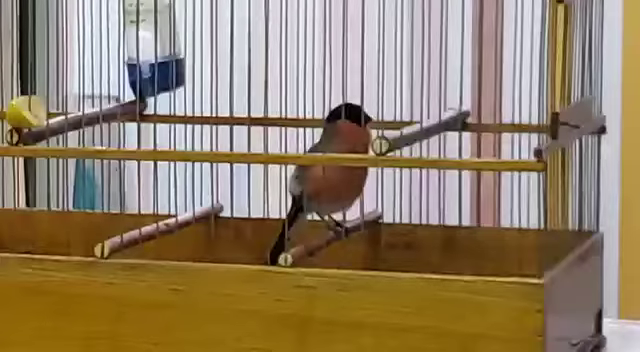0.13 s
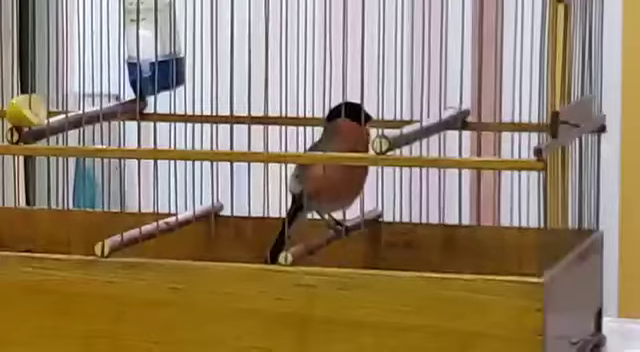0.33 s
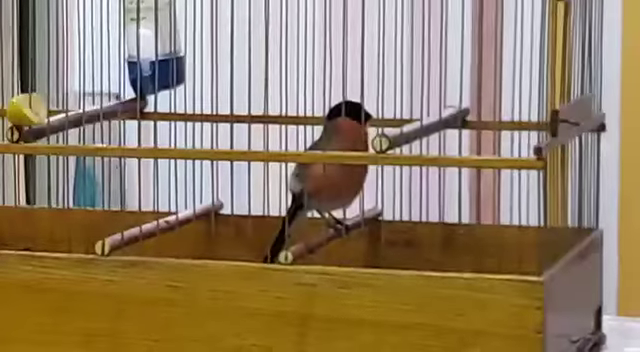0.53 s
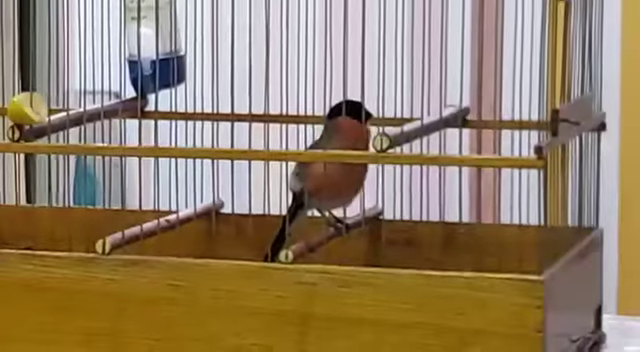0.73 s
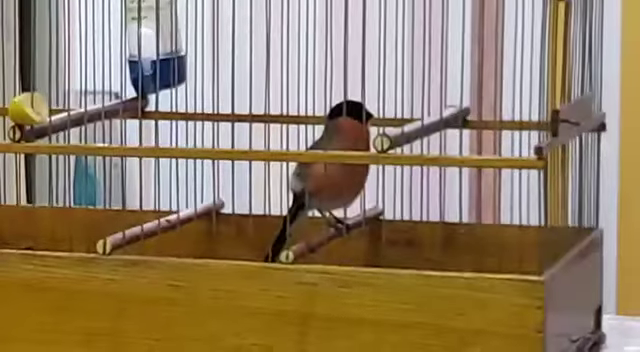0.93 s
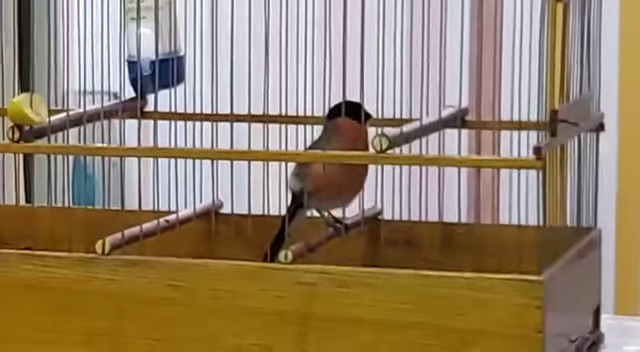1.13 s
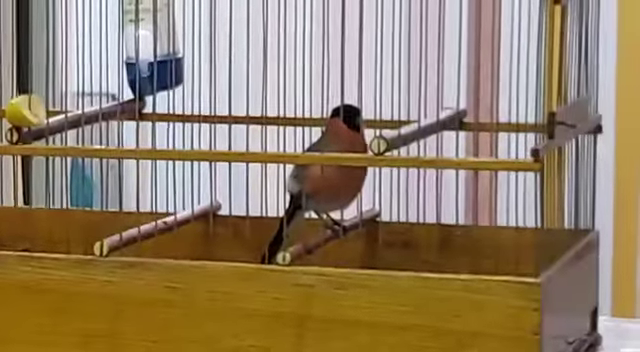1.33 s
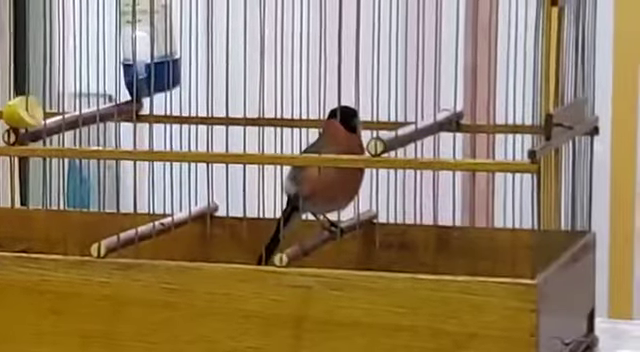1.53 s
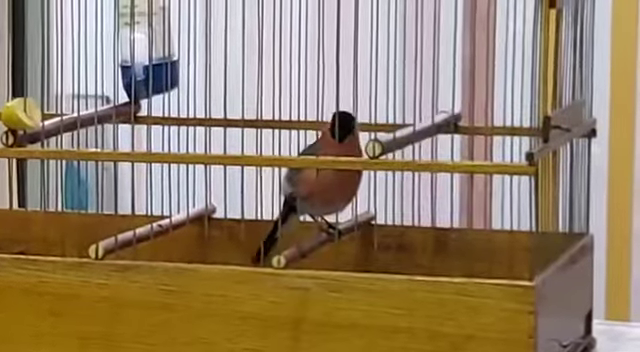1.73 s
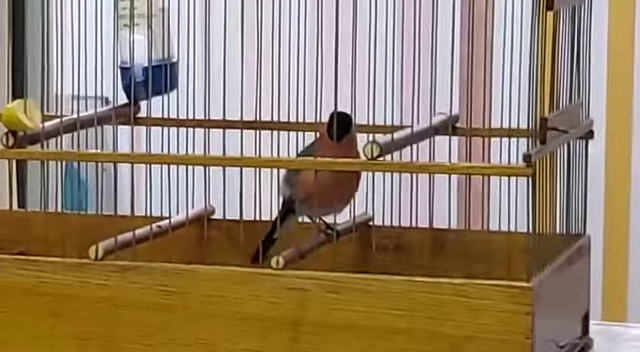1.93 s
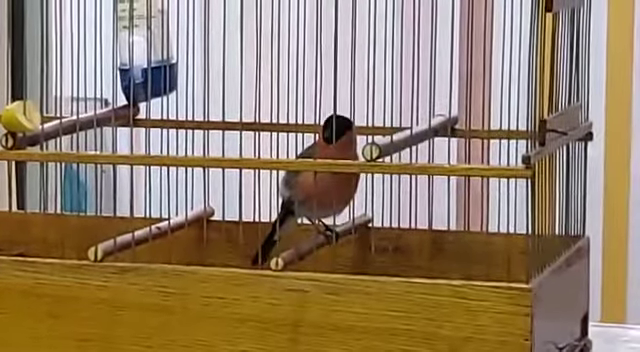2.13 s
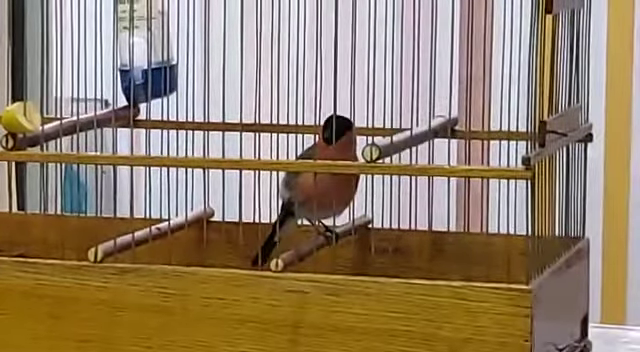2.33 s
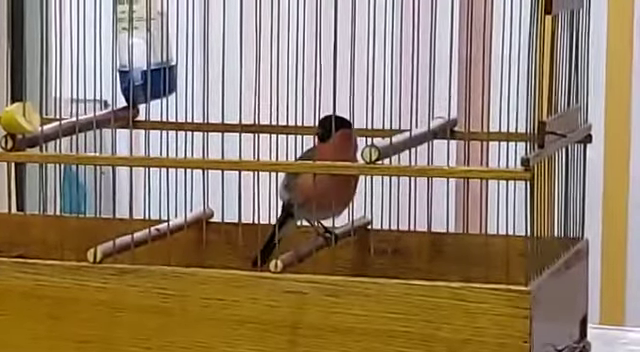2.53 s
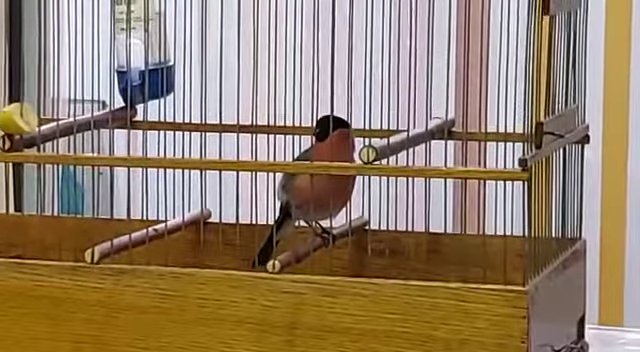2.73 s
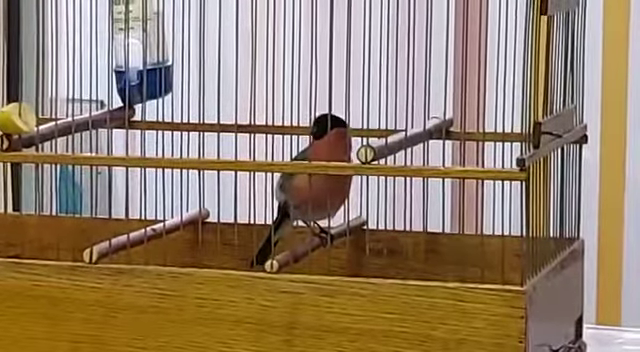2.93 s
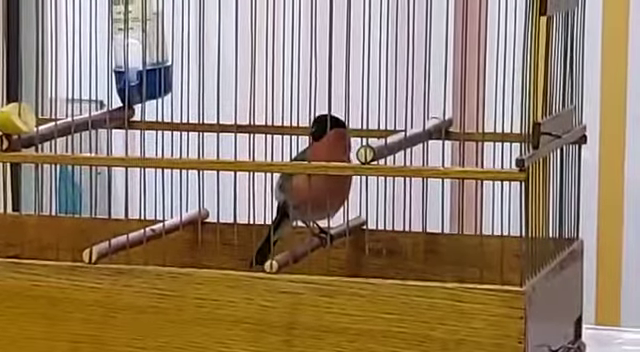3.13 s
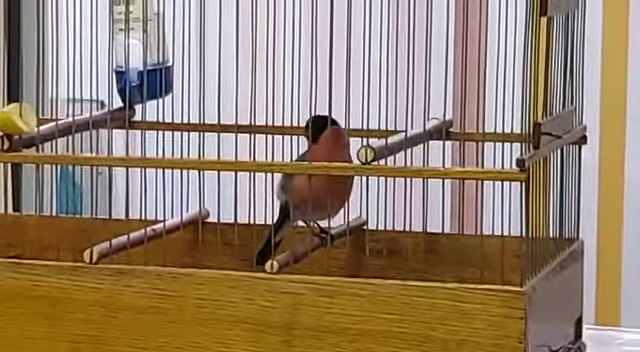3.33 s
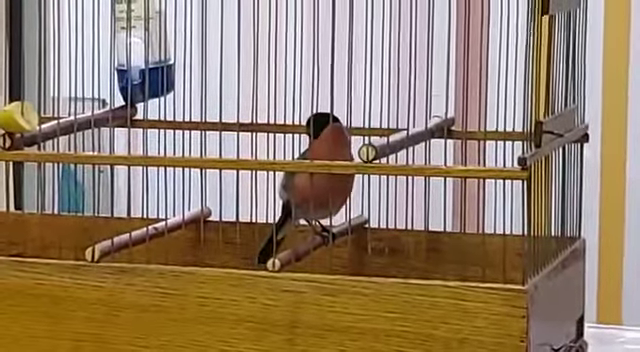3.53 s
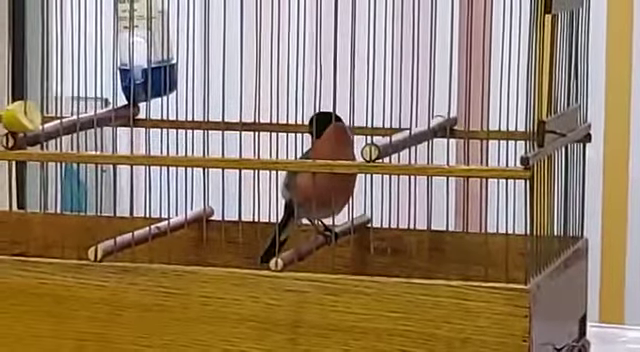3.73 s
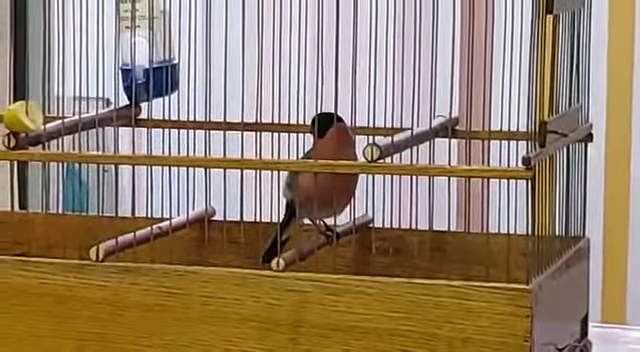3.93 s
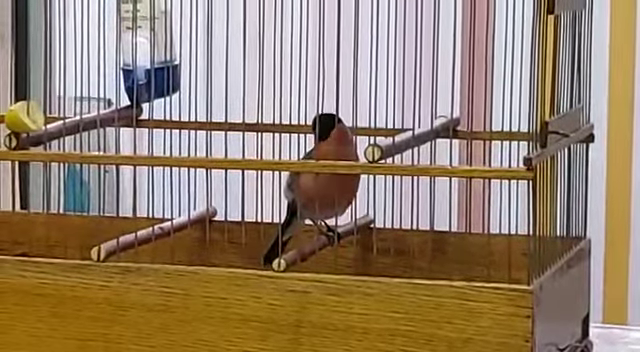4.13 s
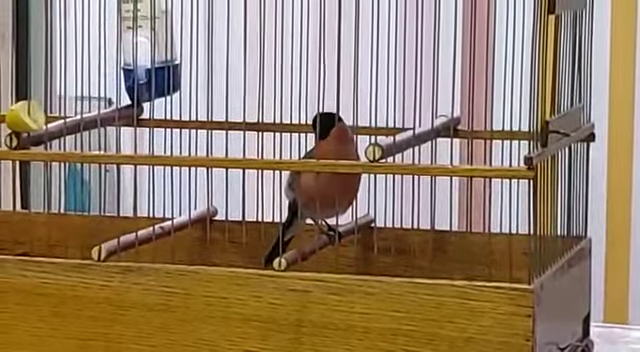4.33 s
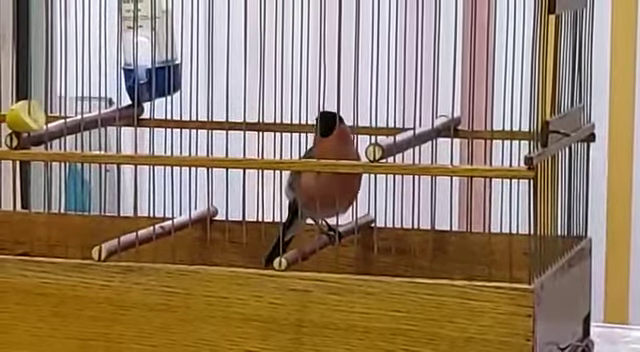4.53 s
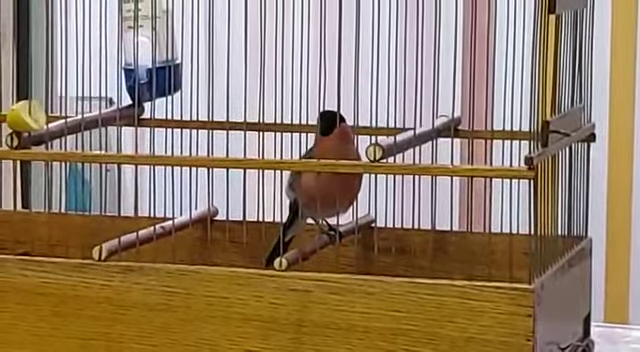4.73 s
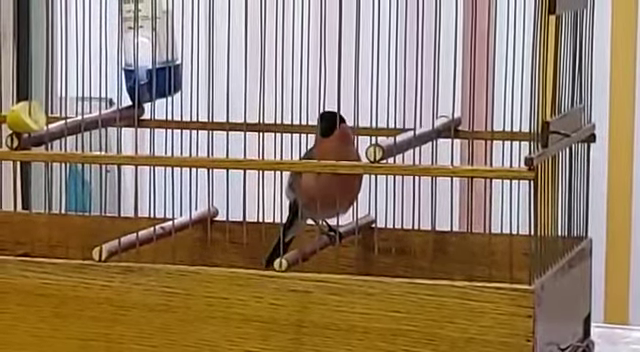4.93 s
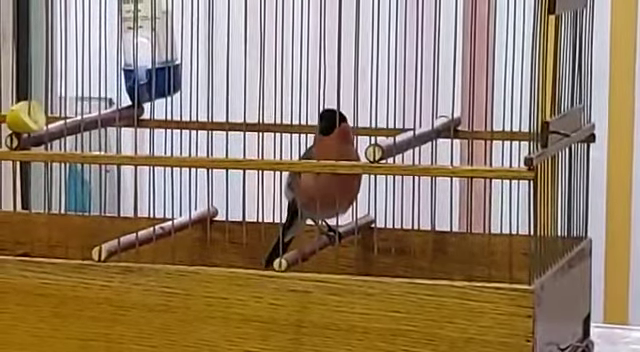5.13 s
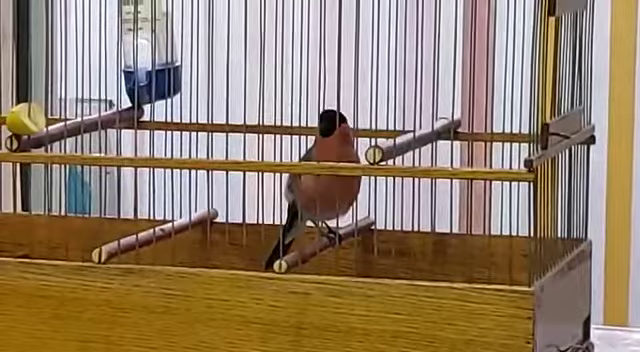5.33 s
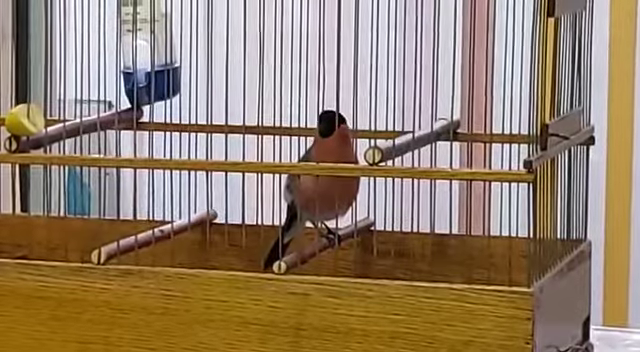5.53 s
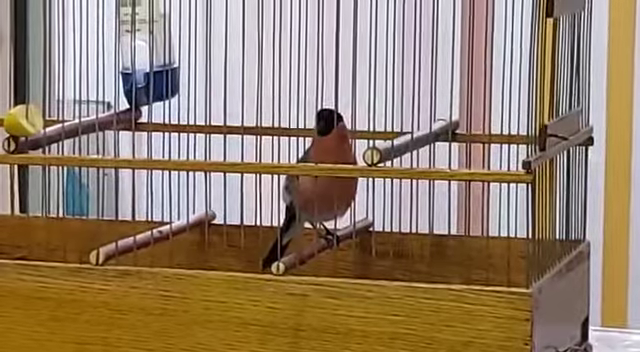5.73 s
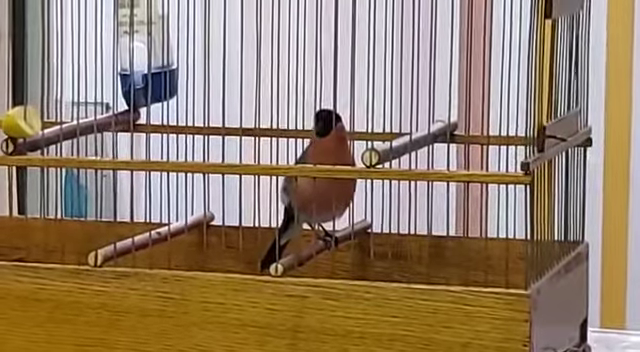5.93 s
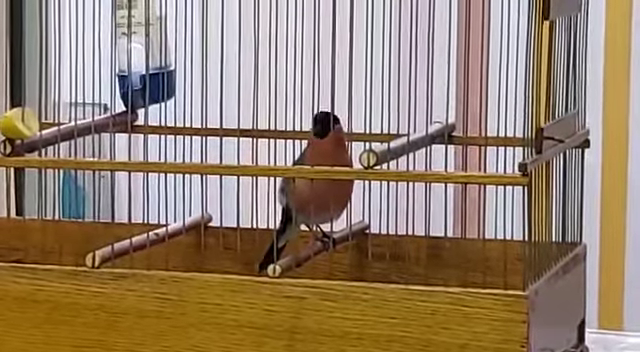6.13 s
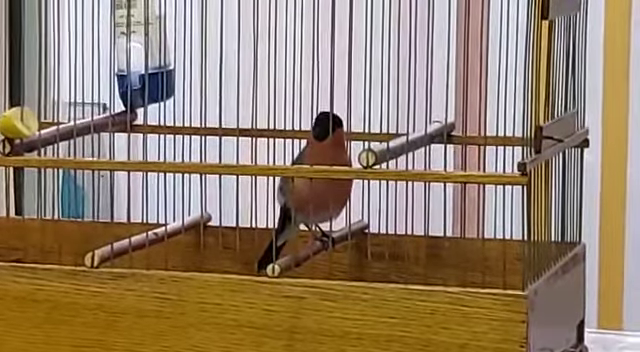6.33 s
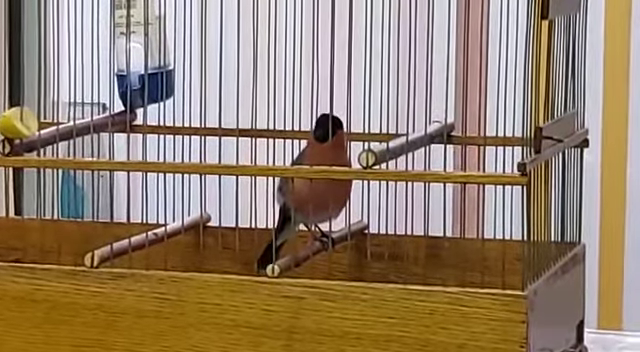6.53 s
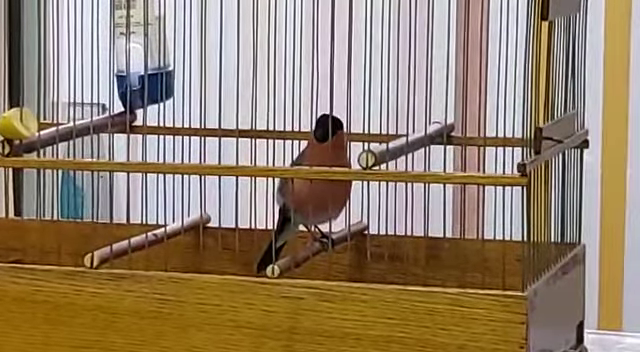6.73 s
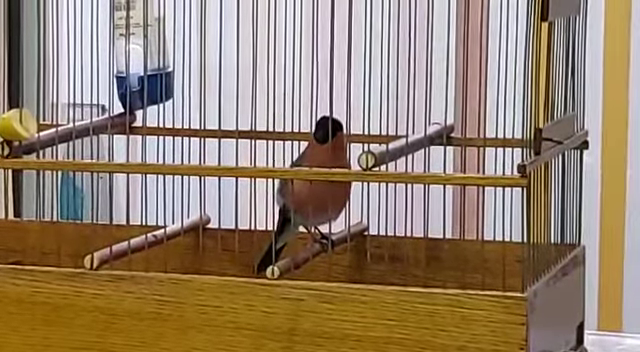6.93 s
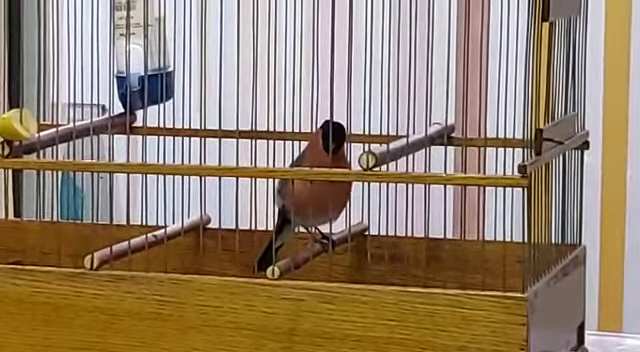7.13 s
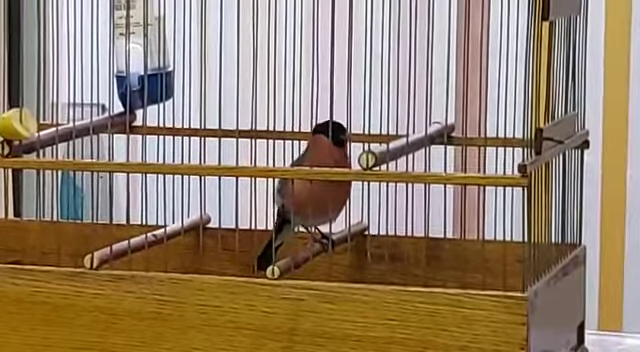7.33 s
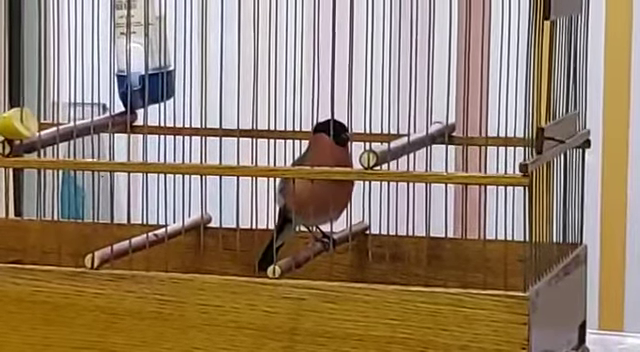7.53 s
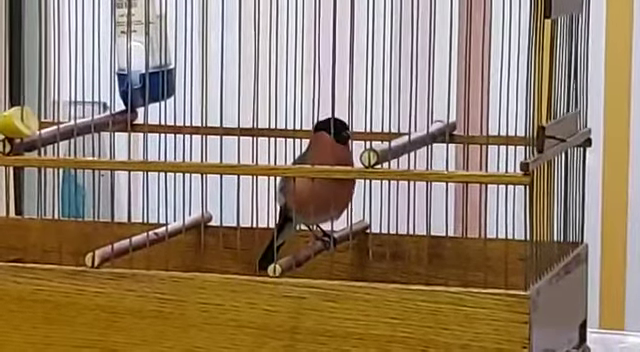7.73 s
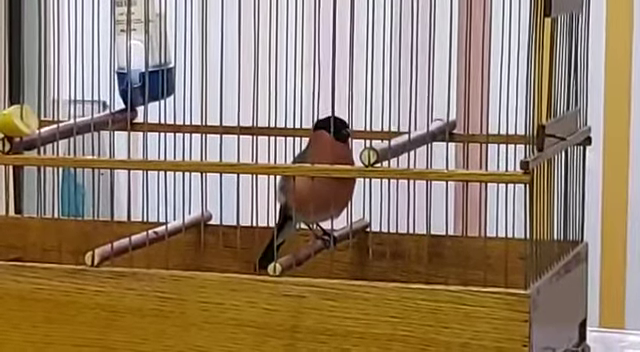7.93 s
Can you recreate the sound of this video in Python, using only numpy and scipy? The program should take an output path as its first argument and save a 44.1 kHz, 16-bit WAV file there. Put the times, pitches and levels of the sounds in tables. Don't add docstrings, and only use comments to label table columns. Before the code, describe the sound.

Quiet bullfinch song indoors: raspy grunts, sliding notes, one clear whistle, short chips, creaky snaps and piping notes above faint room rumble.

```python
import sys
import numpy as np
from scipy import signal
from scipy.fft import rfft, irfft, next_fast_len
from scipy.io import wavfile
from scipy.ndimage import uniform_filter1d, map_coordinates

SR = 44100
rng = np.random.default_rng(int(sys.argv[2]) if len(sys.argv) > 2 else 0)


def materialize(psi):
    bounded = np.clip(np.atleast_2d(psi).T, -1, 1)
    quanta = np.round(bounded * 32767).astype(np.int16)
    wavfile.write(sys.argv[1], SR, quanta)


def undo_db(level):
    steps = np.asarray(level, float) / 20
    return 10 ** steps


N = 356989

# frequency in Hz, gain in dB.
THROAT_GAIN = [(2000, 10.5), (3200, -9), (5400, -0.5), (6700, 2), (7600, -10), (8400, -5.5), (9700, -16),
               (12300, -11.5), (14500, -49)]
# start in seconds, strength in dB, octave in dB, overtones in dB, length as a ratio.
BURST_TIMES = [(0.91, 0, 0, 0.0054, 0.96), (7.609, 0, 0, 0.0077, 0.93)]
ARCH_TIMES = [(1.71, -4.5, -0.55, 0.16, .88), (6.319, 0.5, 0.54, 0.36, 1.01)]
WHISTLE_TIMES = [(2.82, 0.43, 0.5, 0.5, 1.006)]
SCRAPE_TIMES = [(3.147, -2, -2, 1.5, .74), (3.361, 1, -1.5, 0.62, .96)]
CHIP_TIMES = [(3.618, -4.5, -6.5, -4, 0.94), (3.999, 0.5, 2.5, 1, 0.97), (4.348, -2, 4.5, 4, 1.01)]
SNAP_TIMES = [(5.136, -2.5, -3, 8.5, .95), (5.418, -9, 4.5, 3, 0.812), (5.714, 0.5, 0.5, -6, 1.01)]
PIPE_TIMES = [(6.968, 1, 0, 0.0061, .97), (7.25, -0.57, 0.012, 0.007, 1.03)]


def unit(x):
    return x / np.sqrt(np.mean(x ** 2) + 1e-20)


def along(points, hz):
    f, v = np.transpose(points)
    return np.interp(np.log(hz + 1), np.log(f + 1), v)


def wobble(rate, size):
    knots = rng.standard_normal(int(size * rate / SR) + 4)
    return unit(map_coordinates(knots, [np.arange(size) * rate / SR]))


def filtered(x, response):
    m = next_fast_len(N + 8192)
    return irfft(rfft(x, m) * response(np.fft.rfftfreq(m, 1 / SR)), m)[..., :N]


def stroke(rows, edge):
    s, *cols = np.transpose(rows)
    t = np.arange(s[0] - edge, s[-1] + edge, 1 / SR)
    gate = np.clip(np.minimum(t - t[0], t[-1] - t) / (2 * edge), 0, 1)
    return round(t[0] * SR), gate ** 2, [np.interp(t, s, c) for c in cols]


def pair(spectrum, alike):
    def response(hz):
        turn = np.arccos(np.clip(along(alike, hz), -1, 1)) / 2
        return undo_db(along(spectrum, hz)) * [np.cos(turn), np.sin(turn)]
    mid, side = filtered(rng.standard_normal((2, N)), response)
    return unit(np.array([mid + side, mid - side]))


def bumps():
    # time of the peak in seconds, frequency in Hz, level in dB.
    bump_rows = [(.2, 200, -68), (.3, 205, -57.5), (.47, 200, -59.5), (0.231, 440, -63.5),
                 (.45, 390, -59.5), (.66, 320, -61.5), (1.73, 400, -65.5), (2.67, 320, -60.5),
                 (3.25, 400, -59.5), (5.97, 320, -59)]
    t = np.arange(N) / SR
    out = np.zeros(N)
    for s, hz, db in bump_rows:
        out += undo_db(db - 9.6 * ((t - s) / 0.085) ** 2) * np.sin(2 * np.pi * hz * t)
    return out


def background():
    # frequency in Hz, density in dB per Hz.
    air_spectrum = [(15, -37.5), (25, -20), (101, -4), (126, -5.5), (188, -3.5), (274, -6.5), (804, -14),
                    (1340, -20.5), (1620, -17.5), (2120, -20), (2700, -24.5), (15500, -48.5)]
    # frequency in Hz, left-right likeness from 0 to 1.
    air_alike = [(100, 0.45), (300, 0.81), (650, 0.36), (1400, 0)]
    # frequency in Hz, level in dB rms.
    hum_lines = [(50, -71.5), (100, -63), (150, -75), (200, -67), (500, -93), (942, -81)]
    # time in seconds, level in dB.
    rumble_level = [(0.3, -58), (1.1, -68), (2, -67), (2.6, -65.5), (3.9, -62.5), (4.6, -77), (5.4, -57.5),
                    (6.4, -66), (7.3, -57), (8, -64)]
    t = np.arange(N) / SR
    air = undo_db(-59 + 0.7 * wobble(1.7, N) + 0.8 * wobble(7, N)) * pair(air_spectrum, air_alike)
    hum = np.zeros(N)
    for hz, db in hum_lines:
        level = np.sqrt(2) * undo_db(db + 1.5 * wobble(8, N))
        hum += level * np.sin(2 * np.pi * hz * t + 0.3 * wobble(6, N))
    swell = undo_db(np.interp(t, *np.transpose(rumble_level)) - 1.5 + 2.4 * wobble(7, N))
    rumble_spectrum = [(15, -34.5), (28, -3.5), (45, -3.0), (70, -8.0), (120, -52.0)]  # (Hz, dB per Hz)
    rumble = swell * pair(rumble_spectrum, [(50, 1.0)])
    return (air + hum + rumble + bumps()) * undo_db([[-1.5], [1.5]])


def room(x):
    # frequency in Hz, t60 in seconds.
    decay_time = [(1000, 0.38), (2200, 0.36), (6000, 0.31), (12000, 0.21)]
    # delay in seconds, level in dB.
    wall_echoes = [(.0038, -12), (.0043, -15), (.0058, -13.5), (.0082, -16), (0.0125, -14.5), (.014, -15),
                   (.0202, -12.5), (0.0262, -23.5)]
    # frequency in Hz, side against mid in dB.
    side_gain = [(1000, 2.5), (2500, -3.5), (5000, 1.3)]
    hop = round(0.6 * SR)
    out = np.zeros((2, N + 3 * hop + SR))
    for i in range(-hop, N, hop):
        hz, t, z = signal.stft(rng.standard_normal((2, SR // 2)), SR, nperseg=256)
        decay = undo_db(-60 * t / along(decay_time, hz)[:, None])
        tail = signal.istft(z * decay, SR, nperseg=256)[1]
        tail = undo_db(-8.5) * np.pad(tail / np.linalg.norm(tail[0]), ((0, 0), (300, 0)))
        for k, (delay, db) in enumerate(wall_echoes):
            tail[:, round(delay * SR)] += undo_db(db) * np.array([(-1) ** k, 0.71 * (-1) ** (k // 2)])
        piece = np.pad(x, (hop, 2 * hop))[i + hop:i + 3 * hop] * np.hanning(2 * hop)
        answer = signal.fftconvolve(piece[None], tail, axes=1)
        out[:, i + hop:i + hop + answer.shape[1]] += answer
    mid, side = out[:, hop:hop + N]
    side = filtered(side, lambda hz: undo_db(along(side_gain, hz)))
    return np.array([mid + side, mid - side])


def clicks():
    # start in seconds, level in dB, t60 in seconds.
    click_rows = [
        (0.296, -50, .012),
        (.601, -49, 0.014),
        (.918, -53.5, .012),
        (5.423, -46, 0.014),
        (7.616, -51.5, 0.01),
    ]
    out, t = np.zeros(N), np.arange(SR // 40) / SR
    for s, db, t60 in click_rows:
        out[round(s * SR):][:len(t)] += undo_db(db - 60 * t / t60) * rng.standard_normal(len(t))
    return filtered(out, lambda hz: undo_db(along(THROAT_GAIN, hz)) * (hz > 900))


def puff(s, hiss_db, hiss_s, rush_db, rush_s):
    rise_s, fade_s = 0.032, 0.033
    at = np.array([0, rise_s, hiss_s, hiss_s + fade_s, rush_s])
    under_db = np.array([10.5, 0, 6, 31.5, 31.5])
    return np.transpose([s + at, hiss_db - under_db, rush_db - 12.5 * at / rush_s])


def streaks(hz):
    spacing_hz, depth_db = 90, 2.2
    knots = rng.standard_normal(int(hz[-1] / spacing_hz) + 4)
    return undo_db(depth_db * map_coordinates(knots, [hz / spacing_hz]))


def wheezes():
    # start in seconds, beak hiss in dB, hiss length in seconds,
    # windpipe rush in dB, rush length in seconds.
    wheeze_rows = [(0.097, -72, 0.048, -55.5, 0.21), (0.304, -55.5, 0.093, -50, 0.16),
                   (0.607, -54.5, 0.082, -53, 0.14), (2.04, -53.5, 0.083, -51.5, 0.35),
                   (5.984, -72, .022, -61, 0.098), (6.262, -71.5, 0.034, -56.5, 0.13),
                   (1.775, -54.5, 0.044, -75, 0.078), (5.128, -56, 0.044, -64, 0.093),
                   (5.71, -65, .035, -60, 0.092), (6.396, -52, 0.043, -67, .085),
                   (6.587, -52, 0.078, -49, 0.22), (6.729, -74, 0.061, -56, .13),
                   (7.35, -64.5, 0.088, -52, 0.13)]
    # frequency in Hz, density in dB per Hz.
    hiss_spectrum = [(2500, -6.5), (4000, -11), (5200, -3), (6500, -1), (9000, -14.5), (12500, -15),
                     (14000, -50)]
    rush_spectrum = [(500, -3.5), (750, -0.5), (1350, 3), (2200, -3), (2800, -13.5), (4000, -34)]

    def breath(spectrum):
        noise = rng.standard_normal(N)
        return unit(filtered(noise, lambda hz: undo_db(along(spectrum, hz)) * streaks(hz)))

    hiss, rush = breath(hiss_spectrum), breath(rush_spectrum)
    out = np.zeros(N)
    for row in wheeze_rows:
        i, gate, (hiss_db, rush_db) = stroke(puff(*row), edge=0.0016)
        part = slice(i, i + len(gate))
        hiss_grain = undo_db(2.2 * wobble(180, len(gate)))
        rush_grain = undo_db(2.2 * wobble(70, len(gate)))
        out[part] += gate * hiss_grain * undo_db(hiss_db - 2.0) * hiss[part]
        out[part] += gate * rush_grain * undo_db(rush_db - 6.0) * rush[part]
    return out


def throb():
    # start in seconds, length in seconds, throb rate in Hz, depth in dB.
    throb_rows = [
        (.325, .055, 527, -5),
        (.637, .055, 535, -8),
        (1.255, 0.064, 448, 2),
        (3.175, .04, 474, -9),
        (3.393, .055, 461, -2),
        (5.115, .025, 466, -4),
        (5.68, 0.03, 463, -7),
        (6.023, .07, 445, -3),
    ]
    out = np.zeros(N)
    for s, size, hz, db in throb_rows:
        i, gate, _ = stroke([(s, 0), (s + size, 0)], edge=0.0054)
        turn = 2 * np.pi * np.cumsum(hz * (1 + 0.015 * wobble(55, len(gate)))) / SR
        out[i:i + len(gate)] += undo_db(db) * gate * np.sin(turn)
    return out


def sung(shape, times, octave_db, rough):
    return [[(start + s * pace, hz, db + gain_db, beak_db + octave_db + more_db, beak_db + upper_db, rough)
             for s, hz, db, beak_db in shape]
            for start, gain_db, more_db, upper_db, pace in times]


def voice(notes):
    even_lag, even_below_hz = 0.45, 1450
    out = np.zeros(N + SR)
    noise = rng.standard_normal(N)
    air = unit(filtered(noise, lambda hz: undo_db(along(THROAT_GAIN, hz)) * (hz > 3500)))
    for rows in notes:
        i, gate, (hz, db, octave_db, upper_db, rough) = stroke(rows, edge=0.004)
        hz = uniform_filter1d(hz, size=200)
        glide = np.abs(np.gradient(np.log(hz))) * SR
        rough = np.clip(rough + 0.001 * glide, 0, 1)
        turn = 2 * np.pi * np.cumsum(hz * (1 + 0.361 * rough * wobble(715.7, len(hz)))) / SR
        tone = np.sin(turn) + undo_db(octave_db) * np.sin(2 * turn)
        late_db = even_lag * (hz < even_below_hz) * np.minimum(upper_db, 0)
        for k in range(3, 11):
            level_db = upper_db + (k % 2 == 0) * late_db + along(THROAT_GAIN, k * hz)
            tone += undo_db(level_db + 2 * rng.standard_normal()) * np.sin(k * turn + k * k)
        tone += undo_db(upper_db - 5.5) * np.sqrt(rough) * air[i:i + len(hz)]
        flutter = undo_db(4.5 * rough * wobble(160, len(hz)))
        out[i:i + len(hz)] += np.sqrt(2) * undo_db(db) * gate * flutter * tone
    return out[:N]


def second_voice():
    # time from the syllable's start in seconds, pitch in Hz, level in dB,
    # beak opening as overtones in dB.
    burst_zip = [(.004, 1305, -53, -30), (.012, 1422, -51.5, -35), (.018, 1720, -49.5, -40),
                 (.023, 2344, -48.5, -40), (.029, 2900, -53.5, -40), (.036, 3130, -60, -40)]
    sag_high = [(0, 2365, -55.5, -11), (.025, 2291, -59, -4), (.055, 2262, -71.5, -6), (.08, 2280, -70, -5)]
    arch_low = [(0, 1883, -56.5, -9), (.013, 1920, -51, -9), (.029, 2045, -46.5, -6.5),
                (.037, 2107, -42, -8), (.053, 2244, -47, -3.5), (.066, 2268, -59.5, 6.5),
                (.086, 2250, -60, 4.5)]
    scrape_drone = [(.036, 804, -65, 2), (.05, 812, -63.5, 6.4), (.062, 815, -64, 8), (.074, 813, -66, 4.4)]
    hook_return = [(.044, 2008, -46, -40), (.058, 1967, -42.5, -40), (.068, 1985, -64, -40)]
    pipe_grace = [(-.009, 1980, -54, -32), (-.003, 2100, -49.5, -45), (.004, 2160, -57, -42)]
    pipe_fall = [(.057, 1670, -38.5, -49), (.066, 1245, -56.5, -46), (.079, 1000, -57.5, -43)]
    chip_high = [(0, 2034, -49, -34), (.008, 2050, -43, -32), (.016, 2088, -31.5, -40),
                 (.023, 2176, -33.5, -42.5), (.029, 2205, -33.5, -44), (.034, 2300, -50, -44)]
    whistle_high = [(0, 1820, -71, -41), (.018, 1875, -55.5, -40), (.026, 1940, -54, -41),
                    (.035, 2080, -56, -43), (.043, 2150, -67, -42)]
    snap_high = [(.004, 1885, -61, -21.5), (.013, 1878, -49.5, -19.5), (.028, 1870, -54, -26),
                 (.04, 1850, -57, -31)]
    # start in seconds, strength in dB, octave in dB, overtones in dB,
    # length as a ratio.
    sag_high_times = [(1.242, -3.5, 4.6, 13, 0.84), (6.022, 5, 5.9, -14, 0.97)]
    hook_return_times = [(1.323, 0.5, 0, 0.003, 1), (6.107, -4.5, 0, 0, 1.05)]
    # start in seconds, length in seconds, first pitch in Hz, last pitch in Hz, peak
    # level in dB.
    piping = [(0.147, 0.084, 1384, 1337, -60.5), (0.342, 0.05, 1020, 1120, -60.5),
              (.603, 0.0448, 5000, 4975, -56.5), (5.147, .026, 3800, 3460, -56),
              (.91, 0.03, 3500, 3470, -62.5), (0.339, 0.025, 2100, 2050, -59),
              (0.42, .045, 1920, 1950, -61), (7.175, 0.048, 2700, 2700, -77),
              (0.409, 0.04, 1569, 1624, -48.5), (0.35, 0.022, 1200, 1280, -66),
              (0.646, 0.065, 1040, 1115, -57.5), (0.717, 0.0344, 1700, 1555, -49),
              (0.738, 0.042, 1378, 1200, -58), (0.715, 0.05, 2800, 2700, -68.5),
              (4.16, .055, 3160, 3100, -69), (1.166, 0.032, 1730, 1780, -72),
              (7.2, 0.039, 1563, 1543, -64.5), (7.688, .16, 2870, 2940, -76),
              (7.779, 0.091, 1734, 1714, -67)]
    peak = 0.6
    alone = []
    for s, size, first_hz, last_hz, db in piping:
        peak_hz = first_hz + peak * (last_hz - first_hz)
        rows = [(s, first_hz, db - 3), (s + peak * size, peak_hz, db), (s + size, last_hz, db - 5)]
        alone.append([(*row, -26, -40, 0.07) for row in rows])
    return voice(sung(burst_zip, BURST_TIMES, octave_db=-5, rough=0.15)
                 + sung(sag_high, sag_high_times, octave_db=5.0, rough=0.012)
                 + sung(arch_low, ARCH_TIMES, octave_db=-11, rough=0.024)
                 + sung(scrape_drone, SCRAPE_TIMES, octave_db=7.0, rough=0.0723)
                 + sung(hook_return, hook_return_times, octave_db=-5, rough=0.027)
                 + sung(pipe_grace, PIPE_TIMES, octave_db=-1, rough=0.07)
                 + sung(pipe_fall, PIPE_TIMES, octave_db=12, rough=0.11)
                 + sung(chip_high, CHIP_TIMES, octave_db=0.5, rough=0.028)
                 + sung(whistle_high, WHISTLE_TIMES, octave_db=-2, rough=0.015)
                 + sung(snap_high, SNAP_TIMES, octave_db=8, rough=0.11)
                 + alone)


def first_voice():
    # time from the syllable's start in seconds, pitch in Hz, level in dB,
    # beak opening as overtones in dB.
    grunt = [(0, 1300, -55, -17), (.01, 1235, -52, -9), (.03, 1210, -78, -19)]
    rasp = [(0, 1590, -56, -19), (.012, 1630, -48.5, -19), (.03, 1660, -56.5, -14),
            (.048, 1880, -51.5, -15), (.064, 1890, -66, -21)]
    burst = [(0, 1870, -66, -14), (.008, 1900, -57, -24), (.014, 1928, -47, -34), (.02, 2074, -46.5, -45),
             (.03, 2080, -45.5, -45), (.045, 2164, -46, -22)]
    sag = [(0, 1925, -69, -7), (.018, 1907, -47, -9.5), (.045, 1825, -45, -9.5), (.065, 1799, -58.5, -4.5),
           (.089, 1790, -50, -20)]
    hook = [(0, 1915, -50, -13), (.018, 1979, -42, -19.5), (.033, 1963, -40, -31), (.042, 1666, -51, -21),
            (.058, 1563, -50.5, -21), (.07, 1370, -56, -18)]
    arch = [(0, 2038, -65.5, -20), (.013, 2142, -54.5, -16), (.029, 2274, -54, -8.5),
            (.045, 2450, -52.5, -2), (.055, 2515, -57.5, -2), (.077, 2530, -51.5, -7),
            (.09, 2553, -53.5, 0.5), (.1, 2490, -64, 0)]
    drop_slur = [(0, 2190, -51.5, -12), (.009, 2095, -35.5, -9), (.016, 2053, -45, -10),
                 (.021, 1865, -44.5, -6.5), (.028, 1640, -54, -9.5), (.04, 1570, -56, -14)]
    squeak = [(0, 2420, -66, 2), (.006, 2240, -45.5, -17), (.012, 2160, -37, -15.5),
              (.017, 2256, -43, -13.5), (.022, 2340, -49, -5.5), (.028, 2416, -57, 0.5),
              (.037, 2455, -64, 5)]
    whistle = [(0, 1655, -70, -34), (.024, 1722, -55, -46), (.031, 1790, -47, -46),
               (.042, 1927, -40, -39.5), (.07, 1938, -34.5, -37.5), (.095, 1976, -33.5, -36),
               (.135, 1992, -36.5, -40), (.165, 1989, -38.5, -48), (.18, 2010, -51, -57)]
    scrape = [(0, 1820, -42, -11), (.012, 1880, -39, -5), (.02, 2080, -42, -6), (.028, 2218, -44.5, -7.5),
              (.038, 2360, -54, -2.5), (.052, 2444, -54, 1.5), (.066, 2450, -51.5, 5), (.078, 2400, -53, 3)]
    chip = [(0, 1673, -50, -34), (.008, 1775, -40, -35), (.013, 1857, -32.5, -37.5),
            (.018, 1908, -29.5, -35.5), (.028, 1915, -35, -38), (.034, 1930, -41, -46)]
    seep = [(0, 2670, -78, -2), (.045, 2607, -55, -23.5), (.09, 2642, -68.5, -2), (.14, 2580, -46, -26),
            (.175, 2620, -67, -38)]
    seep_late = [(0, 2620, -74, -8), (.025, 2600, -61, -18), (.068, 2600, -60.5, -14),
                 (.1, 2590, -45.5, -24), (.132, 2600, -56.5, -29), (.15, 2605, -67, -34)]
    tick = [(0, 1510, -76, -39), (.012, 1535, -70.5, -28), (.027, 1540, -78, -30)]
    creak = [(0, 1287, -61, -10), (.02, 1326, -47.5, -16), (.054, 1395, -51, -3), (.078, 1420, -55, -0.5)]
    creak_flat = [(0, 1356, -60, -20), (.015, 1340, -52, -18), (.044, 1403, -54, -4),
                  (.064, 1393, -52.5, -4.5), (.08, 1420, -62, -14)]
    creak_long = [(0, 1310, -54, -28), (.012, 1338, -51.5, -11.5), (.035, 1366, -49, -7),
                  (.064, 1382, -48.5, -4), (.085, 1397, -60.5, 6), (.115, 1410, -78, -2)]
    snap = [(0, 1446, -51, -7), (.007, 1511, -48.5, -12), (.014, 1581, -41.5, -16.5),
            (.024, 1633, -41.5, -27), (.034, 1600, -45, -34), (.044, 1580, -56, -35)]
    pipe = [(0, 1697, -41, -45), (.018, 1740, -45.5, -35.5), (.033, 1736, -34, -45),
            (.041, 1825, -36, -37.5), (.05, 1904, -34.5, -51), (.058, 1848, -41, -51.5),
            (.072, 1825, -41, -53), (.088, 1820, -62.5, -43)]
    # start in seconds, strength in dB, octave in dB, overtones in dB,
    # length as a ratio.
    grunt_times = [(.296, 1.5, -13, 5.5, 0.53), (0.601, -4, -8, 5.5, 1.18)]
    rasp_times = [(0.319, -1.2, 0.022, 0, 0.95), (0.631, 0.88, 0, 0, 1)]
    sag_times = [(1.234, -1.5, 0, 2.5, 0.92), (6.011, 4.5, 0, -0.9, 0.9)]
    hook_times = [(1.323, -0.2, 1, -0.087, 0.93), (6.107, -5, -5, -2, 0.94)]
    drop_times = [(1.782, -1.2, -3, 0.5, 0.9), (6.403, 0.5, 2, 2.1, 1)]
    squeak_times = [(2.455, 0.5, 0.5, 0.56, 0.97)]
    seep_times = [(3.733, -1.5, 0.5, 2.5, 1.077)]
    seep_late_times = [(4.09, 0.5, -21, 0.5, 0.98)]
    tick_times = [(4.639, 0.0038, 0.0034, 0, 0.93)]
    creak_times = [(5.064, 0.5, -2, 0.5, 0.93)]
    creak_flat_times = [(5.343, 0.5, 3, 0.5, 0.95)]
    creak_long_times = [(5.636, 0.5, 8.8, 0.5, 0.923)]
    return voice(sung(grunt, grunt_times, octave_db=10.5, rough=0.19)
                 + sung(rasp, rasp_times, octave_db=1.0, rough=0.085)
                 + sung(burst, BURST_TIMES, octave_db=7, rough=0.097)
                 + sung(sag, sag_times, octave_db=-5.5, rough=0.038)
                 + sung(hook, hook_times, octave_db=6.5, rough=0.067)
                 + sung(arch, ARCH_TIMES, octave_db=6, rough=0.016)
                 + sung(drop_slur, drop_times, octave_db=-5.0, rough=0.098)
                 + sung(squeak, squeak_times, octave_db=-0.5, rough=0.01)
                 + sung(whistle, WHISTLE_TIMES, octave_db=5.5, rough=0.0093)
                 + sung(scrape, SCRAPE_TIMES, octave_db=-10, rough=0.02)
                 + sung(chip, CHIP_TIMES, octave_db=5.5, rough=0.017)
                 + sung(seep, seep_times, octave_db=1, rough=0.014)
                 + sung(seep_late, seep_late_times, octave_db=0.5, rough=0.018)
                 + sung(tick, tick_times, octave_db=28.5, rough=0.021)
                 + sung(creak, creak_times, octave_db=-6, rough=0.029)
                 + sung(creak_flat, creak_flat_times, octave_db=-3.5, rough=0.026)
                 + sung(creak_long, creak_long_times, octave_db=-8.5, rough=0.02)
                 + sung(snap, SNAP_TIMES, octave_db=9.5, rough=0.13)
                 + sung(pipe, PIPE_TIMES, octave_db=15, rough=0.014))


def bird():
    main, second = first_voice(), second_voice()
    chop = np.tanh(undo_db(53.0) * second)
    mixed = filtered(main * chop, lambda hz: undo_db(along(THROAT_GAIN, hz)) * (hz > 2300))
    beating = filtered((main + second) * throb(), lambda hz: np.clip((hz - 2800) / 2500, 0, 1))
    return main + second + undo_db(-19.5) * mixed + beating + wheezes() + clicks()


def scene():
    # frequency in Hz, phase of left against right in radians.
    port_phase = [(1000, 0.18), (2500, 0.13), (4500, 0.76), (9000, 1.9)]
    # frequency in Hz, left over right in dB.
    port_lean = [(1000, -1), (2500, -1), (5000, -4), (9000, 0.5)]
    song = undo_db(1.5) * bird()
    direct = filtered(song, lambda hz: np.exp(1j * along(port_phase, hz) * [[0.5], [-0.5]]))
    heard = filtered(direct + room(song), lambda hz: undo_db(along(port_lean, hz) * [[0.5], [-0.5]]))
    return heard + background()


def low_pass(x):
    return signal.sosfilt(signal.butter(12, 15690, fs=SR, output="sos"), x)


def record(dry):
    start_s, top_hz = 0.1, 15715
    t = np.arange(N) / SR
    opening = undo_db(-44 - 130 * (start_s - t)) + (t > start_s)
    hiss = undo_db(-75.0) * rng.standard_normal(dry.shape)
    live = filtered(dry + hiss, lambda hz: hz < top_hz)
    return low_pass(live * np.minimum(opening, 1))


dry = scene()
out = record(dry)
materialize(out)
```